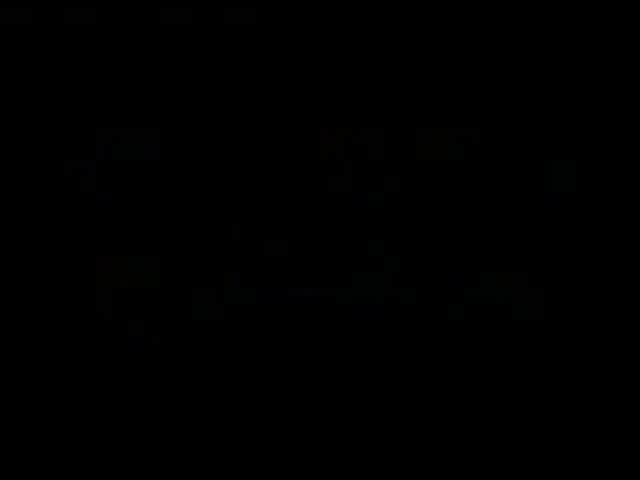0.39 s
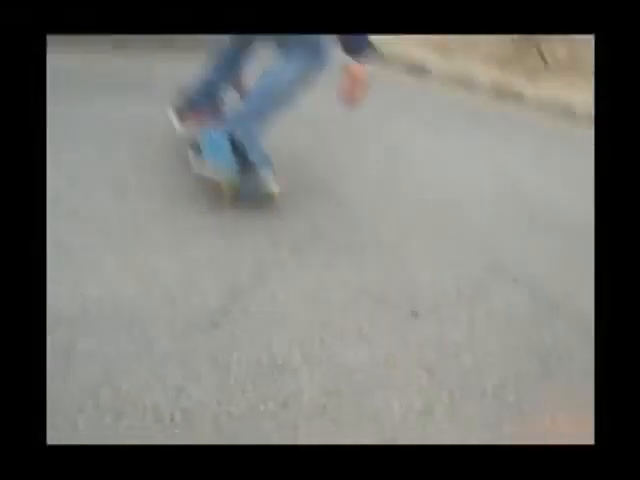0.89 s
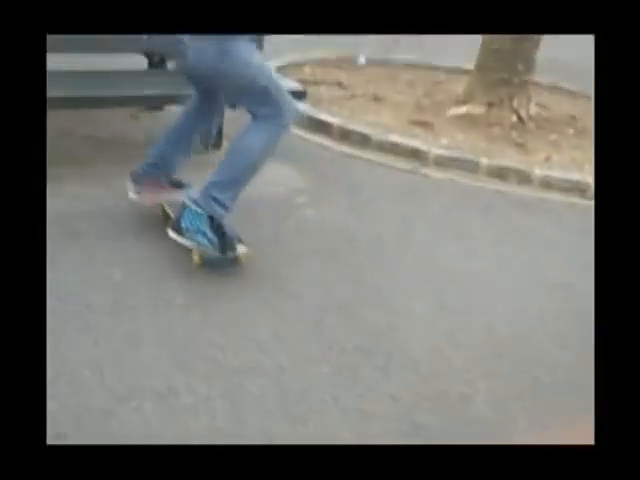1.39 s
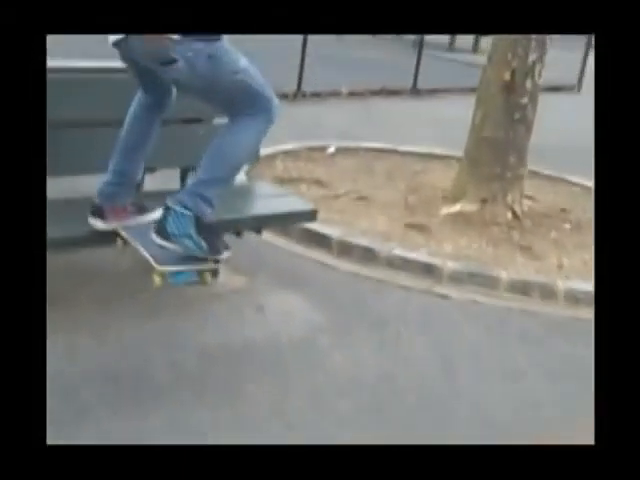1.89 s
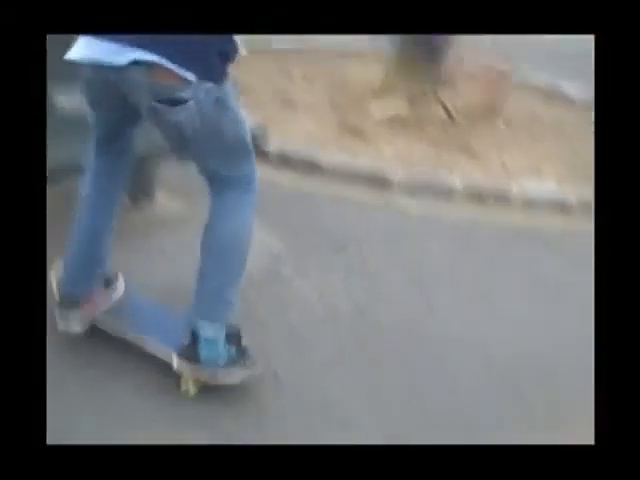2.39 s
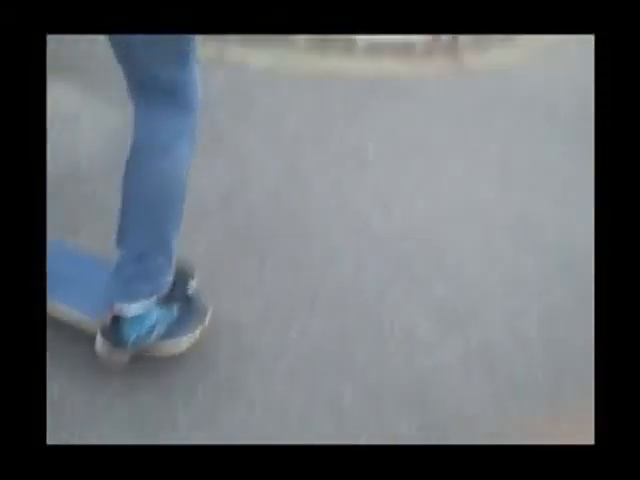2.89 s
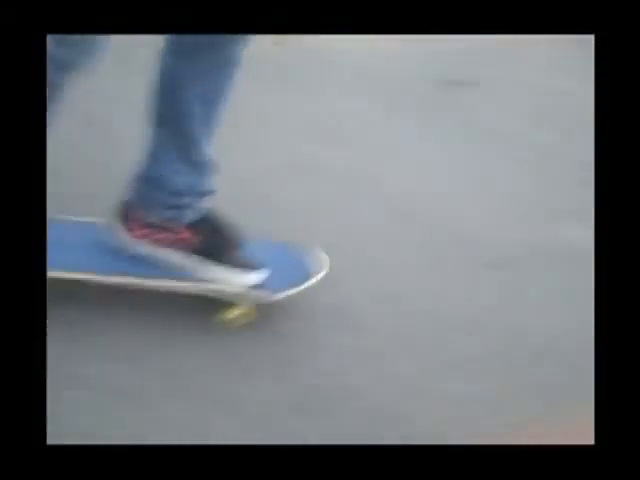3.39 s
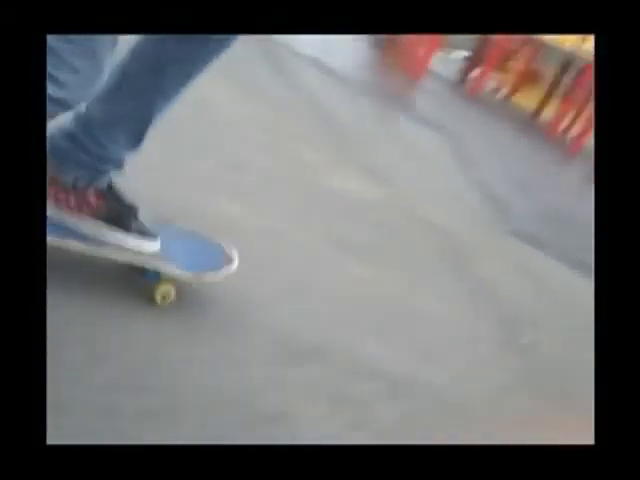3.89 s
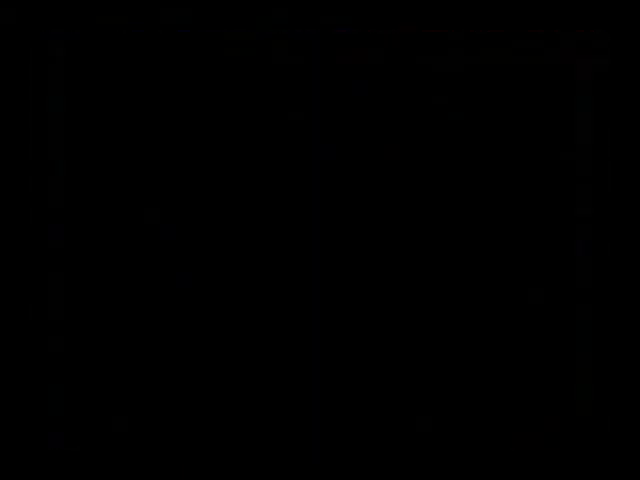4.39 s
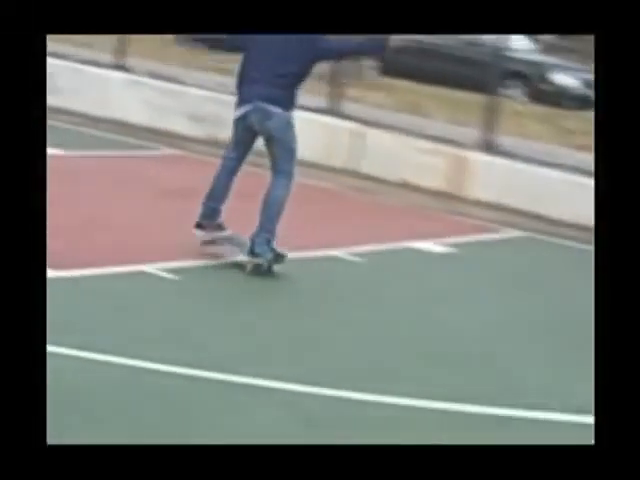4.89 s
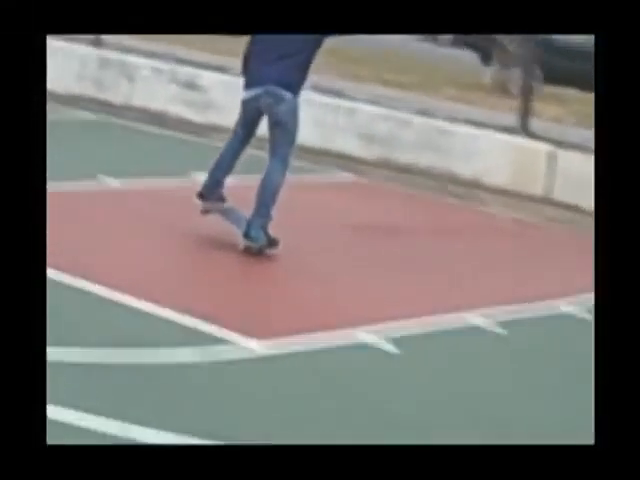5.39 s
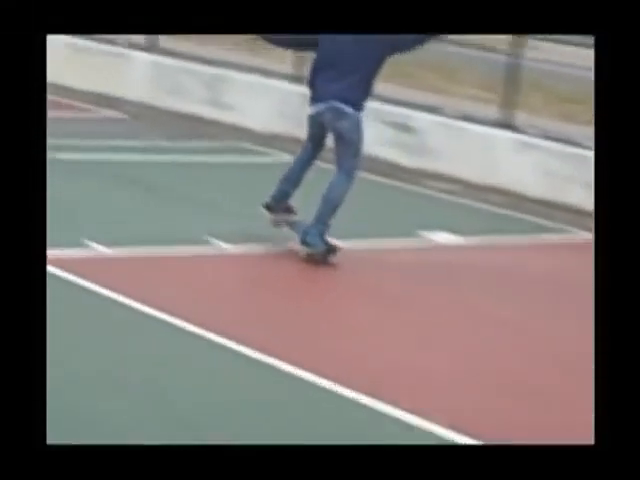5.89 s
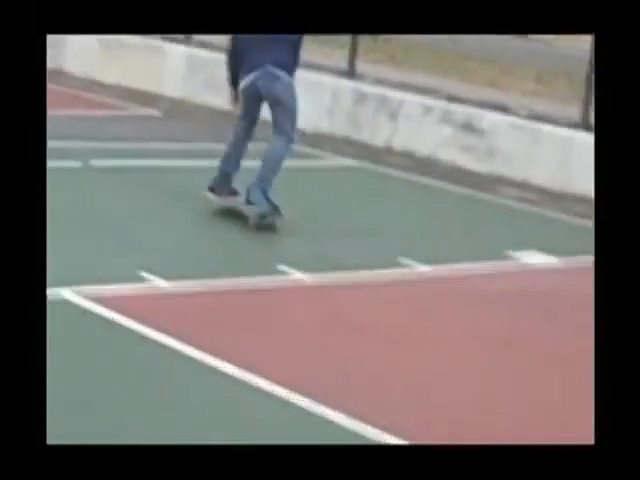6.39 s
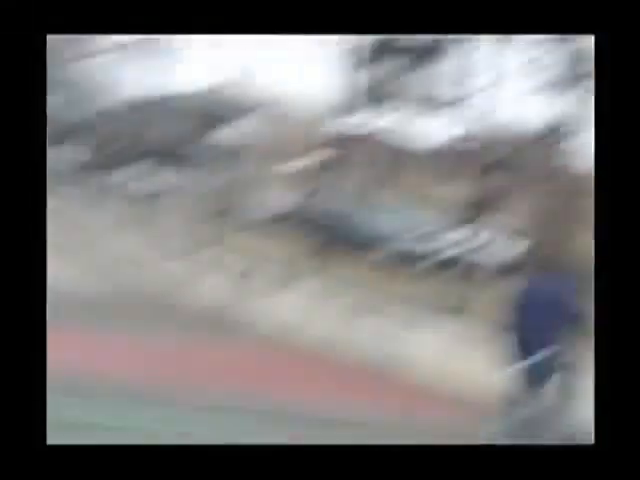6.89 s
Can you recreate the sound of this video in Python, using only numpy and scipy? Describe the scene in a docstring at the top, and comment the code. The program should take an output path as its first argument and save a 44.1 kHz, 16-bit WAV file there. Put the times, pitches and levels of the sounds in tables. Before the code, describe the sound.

Skateboard wheels grind over gritty pavement close to a small microphone, with a faint low engine far off. The board cracks off the ground, bangs on a bench and slaps down again, then the tail scrapes round in rising rasps and quiets. A short dead gap follows. On a court, the wheels make a deeper continuous roar with soft knocks, thinning, then surging before an abrupt end, over distant traffic.

```python
"""Hard pavement outdoors, then a smooth court: a skateboard in two pieces with silence between.
Grit noise shakes deck and wheel resonances and hisses; scrapes and brief surges ring at gliding pitches.
The board is popped, knocked on a bench, landed and scraped round on its tail: blows ring its modes over
noise cracks. Short rough puffs come from shoes, wheels or board, low pulses jolt the microphone.
Shaped noise makes far traffic and an engine note."""
import sys
import numpy as np
from scipy import signal
from scipy.fft import rfft, irfft, next_fast_len
from scipy.io import wavfile
from scipy.ndimage import uniform_filter1d

SR = 44100
rng = np.random.default_rng(int(sys.argv[2]) if len(sys.argv) > 2 else 0)


def transcribe(u):
    """Save the signal u as a 16-bit wav file named by the first command-line argument.

    u: samples, shape (n,) or (channels, n), limited to [-1, 1]; the rate is SR.
    q: integer samples, one column per channel.
    """
    v = np.clip(np.atleast_2d(u).T, -1, 1)
    q = np.round(v * 32767).astype(np.int16)
    wavfile.write(sys.argv[1], SR, q)


def rack_gain(trim_db):
    """Turn a fader trim in dB into the linear factor to multiply a signal by."""
    fader = np.asarray(trim_db, float)
    return 10 ** (fader / 20)


N = 309582
TIME_S = np.arange(N) / SR

# audible pieces, asphalt then court: start_s, end_s
PIECES = [(0.4624, 4.302), (4.6, 7.1)]
ON_COURT = TIME_S > PIECES[1][0]


def rms_one(x):
    """Scale to rms 1."""
    return x / np.sqrt(np.mean(x ** 2) + 1e-20)


def in_time(rows):
    """Columns of a curve table at every sample."""
    s, *columns = np.transpose(rows)
    return [np.interp(TIME_S, s, c) for c in columns]


def colour(x, spectrum):
    """Shape noise by a (Hz, dB) table, straight over log frequency."""
    size = next_fast_len(N)
    hz, db = np.transpose(spectrum)
    log_hz = np.log(np.arange(size // 2 + 1) * SR / size + 1)
    gain = rack_gain(np.interp(log_hz, np.log(hz), db))
    return irfft(rfft(x, size) * gain, size)[:N]


def drift(rate_hz):
    """Low-passed noise of rms 1, a slow chance variation."""
    r = np.exp(-2 * np.pi * rate_hz / SR)
    slow = signal.lfilter([1], [1, -2 * r, r * r], rng.standard_normal(N + SR))
    return rms_one(slow[SR:])   # filter settled


def resonance(x, hz, width_hz):
    """Two-pole band, gain about 1 on top."""
    r = np.exp(-np.pi * width_hz / SR)
    zeros = np.array([1, 0, -1]) * (1 - r * r) / 2
    poles = [1, -2 * r * np.cos(2 * np.pi * hz / SR), r * r]
    return signal.lfilter(zeros, poles, x + 1e-18)


def steep_resonance(x, hz, width_hz):
    """The same two-pole band twice in series."""
    return resonance(resonance(x, hz, width_hz), hz, width_hz)


def body(x, resonances):
    """Parallel steep resonances whose strengths flicker a little as the load shifts; rms 1."""
    flicker_db = 1.0
    return rms_one(sum(rack_gain(db + flicker_db * drift(12.0)) * steep_resonance(x, hz, width_hz)
                       for hz, width_hz, db in resonances))


def glide(x, hz, width_hz):
    """Gliding resonance: shift down by a changing pitch, low-pass, shift back; rms 1."""
    turn = np.exp(2j * np.pi * np.cumsum(hz) / SR)
    r = np.exp(-np.pi * width_hz / SR)
    low = signal.lfilter([1], [1, -2 * r, r * r], x / turn)
    return rms_one((low * turn).real)


def grains(per_s, spread_db):
    """Grit under a wheel: random clicks, a few much larger than the rest; rms 1."""
    sizes = rack_gain(spread_db * np.minimum(rng.exponential(1, N), 5)) * rng.choice([-1, 1], N)
    return rms_one(sizes * (rng.random(N) < per_s / SR))


def deck_rumble(road, bumps):
    """Bumped road noise excites the deck's low resonances; rms about 1."""
    # resonances: pitch_hz, width_hz, relative_db
    asphalt_rumble = [(259, 704, 4.5), (477, 180, -15), (611, 163, 2.5)]
    court_rumble = [(267, 390, 1), (450, 240, -1)]
    # ring rises as weight comes onto all four wheels: time_s, pitch_hz
    court_deck_pitch = [(5.9, 552), (6.3, 629)]
    ring_width_hz, ring_db = 270, 1   # dB against the rest of the rumble
    shake = resonance(road * rack_gain(1.2 * bumps), 320, 940)
    ring = glide(shake, in_time(court_deck_pitch)[0], ring_width_hz)
    court = rms_one(body(shake, court_rumble) + rack_gain(ring_db) * ring)
    return np.where(ON_COURT, court, body(shake, asphalt_rumble))


def wheel_chatter(road, bumps):
    """Trucks and wheels rattle on the road; the noise is shifted so layers add as powers."""
    # resonances: pitch_hz, width_hz, relative_db
    asphalt_chatter = [(940, 1200, 28.4), (1523, 2260, 17.3), (2176, 630, 13), (2790, 450, 4.4)]
    court_chatter = [(1046, 390, -4), (3000, 700, -18.5)]
    # ring of the trucks on the court: time_s, relative_db
    axle_ring = [(5.9, -13.5), (6.2, -13), (6.7, -9.5)]
    axle_hz, axle_width_hz = 2250, 320
    shifted_road = np.roll(road, SR // 200)   # 5 ms
    rattle = resonance(shifted_road * rack_gain(1.4 * bumps), 1575, 2600)
    axle_db = in_time(axle_ring)[0] + 2 * drift(5.6)
    court = body(rattle, [*court_chatter, (axle_hz, axle_width_hz, axle_db)])
    return np.where(ON_COURT, court, body(rattle, asphalt_chatter))


def grit_hiss(road, bumps, slips):
    """Broad treble noise of rolling and of scraping, each at rms 1."""
    # grit spectrum: frequency_hz, relative_db
    grit_spectrum = [(2500, -9), (3400, -12), (5000, -11), (7000, -9.5), (10500, -12), (13000, -13.5)]
    stones = 0.4 * grains(per_s=150., spread_db=2.5) * rack_gain(4 * drift(3))   # loose ticks in clumps
    rough = (road + 0.3 * rng.standard_normal(N)) * rack_gain(1.8 * bumps)
    hiss = rms_one(colour(rough + stones, grit_spectrum))
    rough_slips = (slips + 0.9 * rng.standard_normal(N)) * rack_gain(2.2 * drift(70.))
    return hiss, rms_one(colour(rough_slips, grit_spectrum))


def scrape_bands(slips):
    """Slips ring in two fixed bands."""
    low = resonance(resonance(slips, 1095, 330), 1095, 330)
    high = resonance(resonance(slips, 3080, 400), 3090, 330)
    return 0.39 * rms_one(low) + 0.1 * rms_one(high)


def gliding_scrapes(slips):
    """Scrapes and brief rolling surges ring at gliding pitches; returns their swell and ring."""
    # scrapes and surges: start_s, end_s, swell_db, from_hz, to_hz (before wander)
    scrape_rows = [(0.462, 0.517, -36, 1630, 1590), (0.49, 0.648, -31, 1450, 850),
                   (0.744, 0.907, -38.5, 2160, 2230), (0.718, 0.841, -40.5, 370, 340),
                   (0.747, 0.895, -47.5, 1010, 620), (2.176, 2.32, -45, 1950, 2520),
                   (2.918, 3.18, -38, 1470, 1770), (3.127, 3.262, -28, 1070, 1500),
                   (3.183, 3.376, -25, 1570, 1830), (3.306, 3.495, -33.5, 1700, 1490),
                   (3.73, 3.95, -47.5, 1510, 1900), (6.324, 6.677, -42, 1580, 2650),
                   (6.62, 6.944, -40.5, 1500, 1320), (6.69, 6.975, -41, 2300, 2800)]
    rise_share, fall_s = 0.45, 0.018   # share of length spent rising; time to fall
    width_hz, wander_share = 430, 0.1
    swell, ring = np.zeros(N), np.zeros(N)
    wander = 1 + wander_share * drift(30.)
    for start, end, db, from_hz, to_hz in scrape_rows:
        span = slice(round(start * SR), round(end * SR))
        t = TIME_S[span]
        top = start + rise_share * (end - start)
        shape = rack_gain(db) * np.interp(t, [start, top, max(end - fall_s, top), end], [0, 1, 1, 0])
        pitch_hz = np.linspace(from_hz, to_hz, len(t)) * wander[span]
        swell[span] += shape
        ring[span] += shape * glide(slips[span], pitch_hz, width_hz)
    return swell, ring


def rolling():
    """One stream of grit and bumps drives deck, wheels and hiss; scrapes have their own slips."""
    # wheel work on the ground, as deck rumble before the bass cut: time_s, level_db
    roll_curve = [(0.47, -45.5), (0.7, -36), (0.8, -31.5), (0.88, -33.5), (0.92, -40), (1.05, -45),
                  (1.33, -37.5), (1.44, -34.5), (1.64, -38.5), (1.83, -39), (1.95, -51), (2.15, -52.5),
                  (2.23, -41), (2.43, -46.5), (2.5, -54.5), (3.5, -51), (3.59, -42), (3.7, -47),
                  (3.93, -53), (3.97, -117), (4.3, -59), (4.6, -28.5), (5.6, -26.5), (6.05, -30),
                  (6.3, -34), (6.66, -34.5), (6.82, -24), (6.95, -25), (6.98, -38)]
    mean_roll_db = -40
    chatter_follows, hiss_follows = 0.62, 0.51   # shares of the roll's dB swing
    scrape_deck_db, scrape_wheel_db, scrape_hiss_db = -14.5, -3.5, -7.5   # against the swell
    roll_db, = in_time(roll_curve)
    bumps = drift(31.4)
    road = grains(per_s=2500., spread_db=2.0) + 0.34 * rng.standard_normal(N)
    slips = grains(per_s=3000., spread_db=1.5) * rack_gain(1.5 * bumps)
    swell, scrape_ring = gliding_scrapes(slips)
    deck = deck_rumble(road, bumps)
    wheels = wheel_chatter(road, bumps)
    hiss, rasp = grit_hiss(road, bumps, slips)

    swing_db = roll_db - mean_roll_db
    chatter_db = np.where(ON_COURT, -45, -40) + chatter_follows * swing_db
    hiss_db = np.where(ON_COURT, -51.5, -47.5) + hiss_follows * swing_db
    # roll and scrape gains add as powers
    deck_gain = np.hypot(rack_gain(roll_db), rack_gain(scrape_deck_db) * swell)
    wheel_gain = np.hypot(rack_gain(chatter_db), rack_gain(scrape_wheel_db) * swell)
    scrape = scrape_bands(slips) + rack_gain(scrape_hiss_db) * rasp
    return deck_gain * deck + wheel_gain * wheels + rack_gain(hiss_db) * hiss + scrape_ring + swell * scrape


def traffic():
    """Steady far roar of shaped noise, and one rough engine note of narrow-band noise."""
    # roar spectrum: frequency_hz, relative_db
    roar_spectrum = [(25, -30.5), (200, -12.5), (500, -6.5), (1500, -11), (4000, -25), (11000, -35),
                     (14000, -19.5)]
    # far engine: time_s, level_db
    engine_curve = [(.46, -53.5), (1.5, -54.5), (1.7, -69)]
    engine_db, = in_time(engine_curve)
    roar_db = np.where(ON_COURT, -35.5, -47) + drift(2)
    roar = rack_gain(roar_db) * rms_one(colour(rng.standard_normal(N), roar_spectrum))
    engine = body(rng.standard_normal(N), [(114, 21, 0), (190, 120, -8.0)])
    return roar + rack_gain(engine_db) * engine


def blows():
    """Each blow rings all board modes with fresh strengths, over a short crack of noise."""
    # board modes: pitch_hz, relative_db (before tilt), t60_s (at ring length 1)
    board_modes = [(340, -19, .04), (647, -12, .05), (820, -11, .05), (1023, -7, .065), (1561, -1, .065),
                   (1900, -1, .06), (2360, -3, .05), (2724, -5, .045), (3160, -10, .035), (3700, -13, .03)]
    # blows: time_s, ring_peak_db, ring_length_factor, tilt_db_per_octave (about 1.5 kHz),
    # crack_db (against the ring, before its fixed gain)
    blow_rows = [(0.577, -23.5, 0.44, -8, 0), (0.626, -26, 0.14, 3, 2), (0.843, -19, 0.12, -13, -34),
                 (1.454, -21.5, 0.74, -2, -13), (1.568, -5, 1.22, 2, -13.5), (1.731, 0.5, 0.98, 1.5, -17),
                 (1.756, 3, 1.27, 2, -17), (2.202, -28, 0.93, -43, -38), (2.339, -3.5, 0.78, 2.5, -10.5),
                 (2.347, -8.5, 2.8, -8, -31), (2.3702, -8, 0.17, 15, -5), (2.3798, -9.5, 0.44, -8, -4.5),
                 (2.641, -38, 0.095, 17.5, 7), (2.721, -30.5, 0.21, 2, -2.5), (3.172, -15.5, 0.4, -3, -30),
                 (3.2002, -11, 0.36, -0.5, -35), (3.21, -26, 0.42, 0, -26), (3.338, -15, 1.9, -6, -9.5),
                 (3.373, -31, 0.12, 8, 11.5), (3.397, -23.5, 0.96, -11, 0.5), (4.107, -25, 0.65, -2.5, -22),
                 (4.759, -20.5, 0.34, 5, -24.5), (5.52, -13.5, 0.25, -22, -30.5),
                 (5.549, -8.5, 0.77, -19, -16.5), (5.784, -18, 0.28, -4, -10.5),
                 (6.274, -21.5, 0.18, 1, -0.5), (6.954, -19, 1, -45, -42)]
    crack_t60_s, rattle_t60_s = 0.01, 0.12   # added per unit of ring length
    rattle_db = -7.5   # loose grit and bearings after the crack
    out, t = np.zeros(N + SR), np.arange(SR // 5) / SR
    # plywood and trucks split each mode into a cluster of six
    hz, mode_db, t60_s = np.repeat(np.transpose(board_modes), repeats=6, axis=1)[:, :, None]
    octaves = np.log2(np.maximum(hz, 720) / 1500)   # tilt stops below 720 Hz
    for s, peak_db, length, tilt_db, crack_db in blow_rows:
        strength = rack_gain(mode_db + tilt_db * octaves + rng.normal(0, 3, hz.shape))
        detune = 1 + 0.05 * rng.standard_normal(hz.shape)
        modes = strength * rack_gain(-60 * t / (t60_s * length)) * np.sin(2 * np.pi * hz * detune * t)
        ring = modes.sum(axis=0) * (1 - np.exp(-t / 0.0008))   # contact takes a moment to load
        noise = resonance(resonance(rng.standard_normal(len(t)), 2000, 7000), 2000, 6400)
        crack = 1.14 * noise * (1 - np.exp(-t / 0.00086))
        crack_decay = rack_gain(-60 * t / (0.0031 + crack_t60_s * length))
        rattle_decay = rack_gain(rattle_db - 60 * t / (0.0085 + rattle_t60_s * length))
        crack *= crack_decay + rattle_decay
        at = round(s * SR)
        out[at:at + len(t)] += rack_gain(peak_db) * (ring / np.abs(ring).max() + 2 * rack_gain(crack_db) * crack)
    return out[:N]


def thumps():
    """Jolts of air push the microphone: low, one-sided pulses."""
    # jolts: time_s, peak_db
    jolt_rows = [(1.7327, -11), (1.756, -9.5), (2.343, -20), (3.259, -30), (3.28, -39)]
    clicks = np.zeros(N)
    for s, peak_db in jolt_rows:
        clicks[round(s * SR)] = rack_gain(peak_db)
    r = np.exp(-1 / (0.00018 * SR))   # pulse peaks after 0.18 ms
    return signal.lfilter([np.e * (1 - r)], [1, -2 * r, r * r], clicks + 1e-18)


def rough_puffs():
    """Short rough noise puffs, from shoes, wheels or board, partly ringing in one band."""
    # puffs: start_s, level_db, rise_s, ring_hz, ring_share (0-1)
    puff_rows = [(2.266, -26.5, 0.0029, 3420, 0.79), (2.287, -27, 0.0055, 2240, 0.67),
                 (2.324, -20.5, 0.027, 800, 0.44), (2.869, -36.5, 0.056, 3000, 0.39),
                 (3.695, -22.5, 0.02, 2130, 0.34), (4.096, -30, 0.019, 3240, 0.38),
                 (4.099, -31.5, 0.0084, 1590, 0.89), (4.108, -35.5, 0.019, 690, 0.8),
                 (4.253, -32.5, 0.0047, 856, 0.61), (4.258, -38, 0.008, 1900, 1),
                 (6.663, -28.5, 0.017, 2320, 0.75), (6.865, -25.5, 0.023, 2000, 1)]
    t60_s, ring_width_hz = 0.1, 660
    out, t = np.zeros(N + SR), np.arange(SR // 3) / SR
    for s, level_db, rise_s, ring_hz, share in puff_rows:
        roughness_db = 19.0 * uniform_filter1d(rng.standard_normal(len(t)), size=100)
        rough = rng.standard_normal(len(t)) * rack_gain(roughness_db)
        ring = rms_one(steep_resonance(rough, ring_hz, ring_width_hz))
        broad = rms_one(resonance(rough, 2200, 8700))
        sound = share * ring + max(1 - share, 0) * broad
        shape = np.where(t < rise_s, np.sqrt(t / rise_s), rack_gain(-60 * (t - rise_s) / t60_s))
        at = round(s * SR)
        out[at:at + len(t)] += rack_gain(level_db) * shape * sound
    return out[:N]


def stereo_side(mid):
    """Slight noisy stereo width that follows the mid's level and fades when quiet."""
    # side spectrum: frequency_hz, side_minus_mid_db (before the fade)
    side_spectrum = [(60, -30.5), (180, -26), (530, -44.5), (1600, -21), (4770, -14.5), (14200, -13.5)]
    knee_db = -40.5   # narrows to the middle below this level
    side = colour(mid * drift(200.0), side_spectrum)
    power = uniform_filter1d(mid ** 2, size=1024)
    return side * (power / (power + rack_gain(2 * knee_db))) ** 2


def scene():
    """The board, thinned in the bass, over traffic."""
    low_cut_hz = 150
    high_pass = signal.butter(2, low_cut_hz, "high", fs=SR, output="sos")
    board = signal.sosfilt(high_pass, rolling() + blows() + rough_puffs())
    mid = board + traffic()
    stereo = mid + thumps() + stereo_side(mid) * [[1], [-1]]
    lean_db = np.where(ON_COURT, 0.05, 0.25)   # right up, left down
    return stereo * rack_gain(lean_db * [[-1], [1]])


def top_cut(x):
    """Nothing passes above the cut-off."""
    return signal.sosfilt(signal.butter(12, 14840, fs=SR, output="sos"), x)


def record(dry):
    """Hard cuts between the pieces, peaks rounded near full scale, a steep treble edge."""
    cutoff_hz = 10980
    audible = sum((TIME_S >= start) & (TIME_S < end) for start, end in PIECES)
    rounded = dry * audible / (1 + dry ** 4) ** 0.25
    low_pass = signal.butter(14, cutoff_hz, fs=SR, output="sos")
    mix = signal.sosfilt(low_pass, rounded)
    return top_cut(mix)


dry = scene()
out = record(dry)
transcribe(out)
```